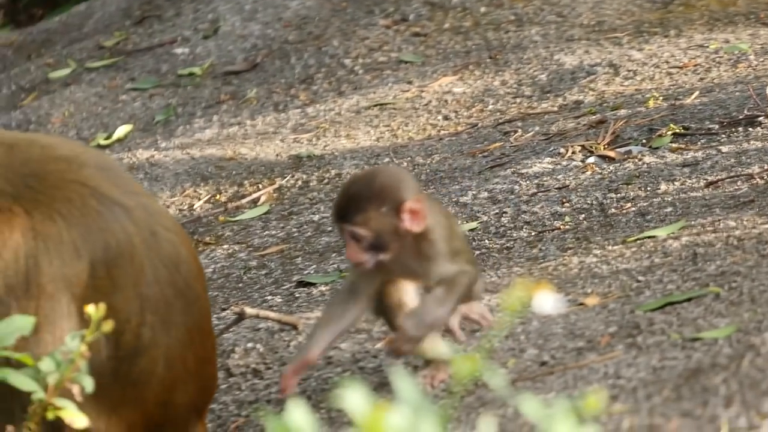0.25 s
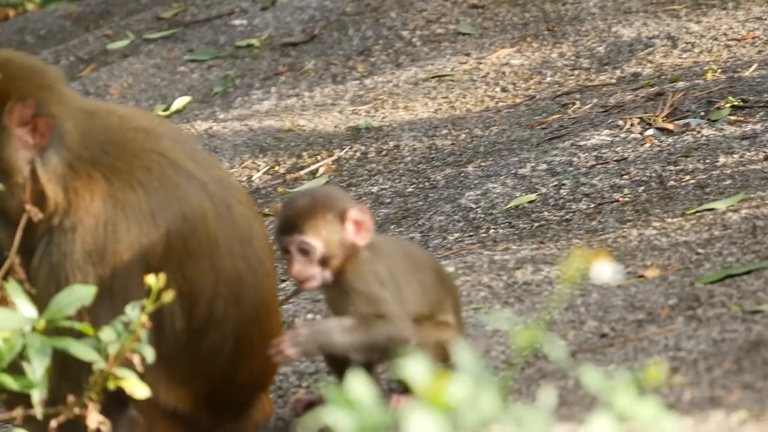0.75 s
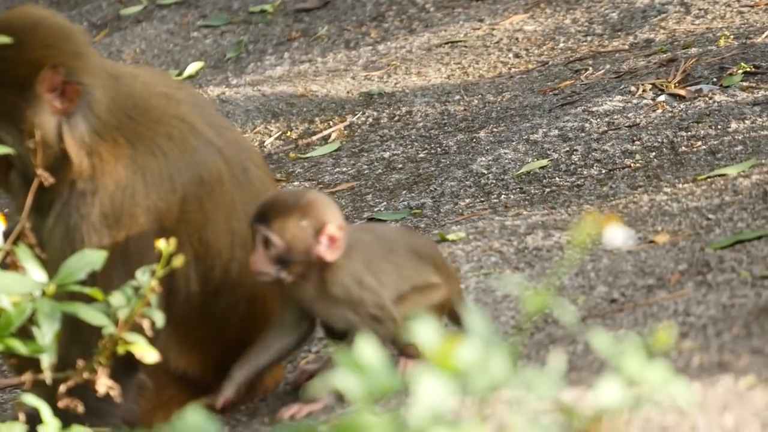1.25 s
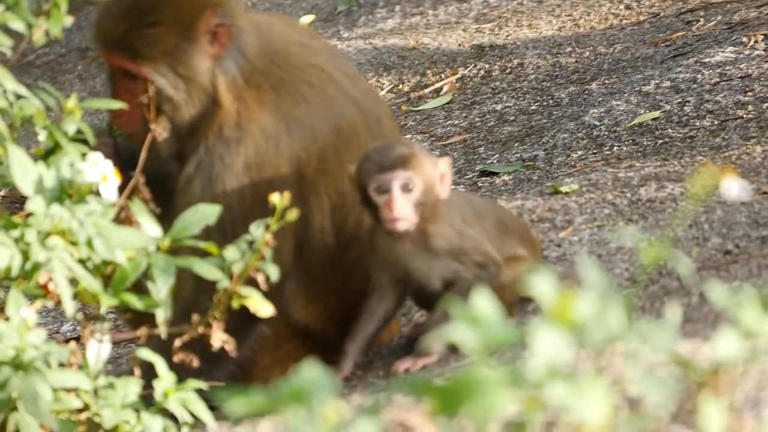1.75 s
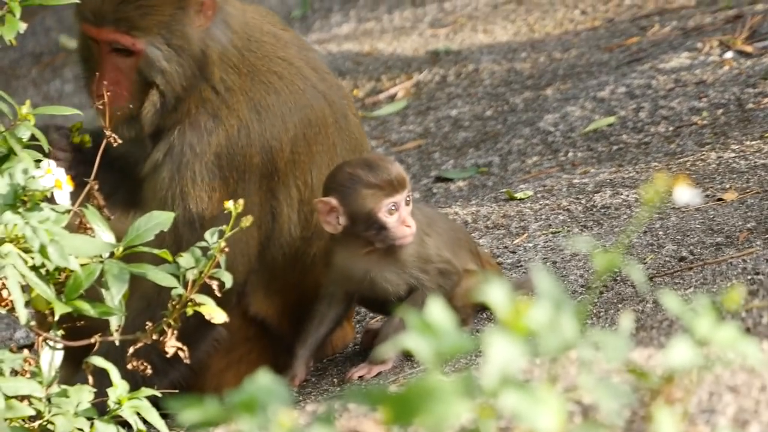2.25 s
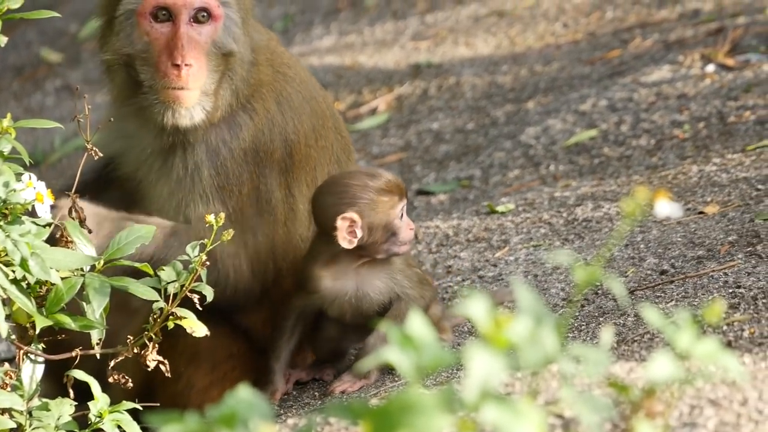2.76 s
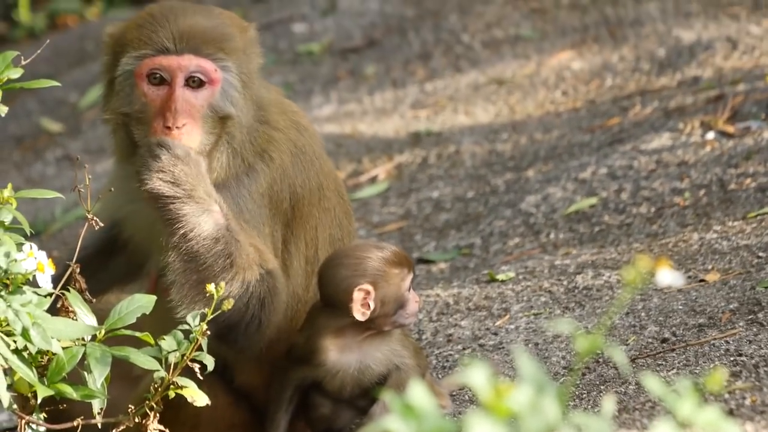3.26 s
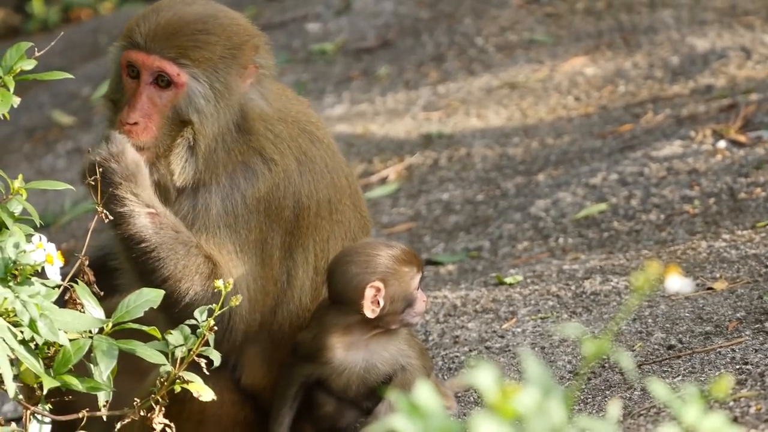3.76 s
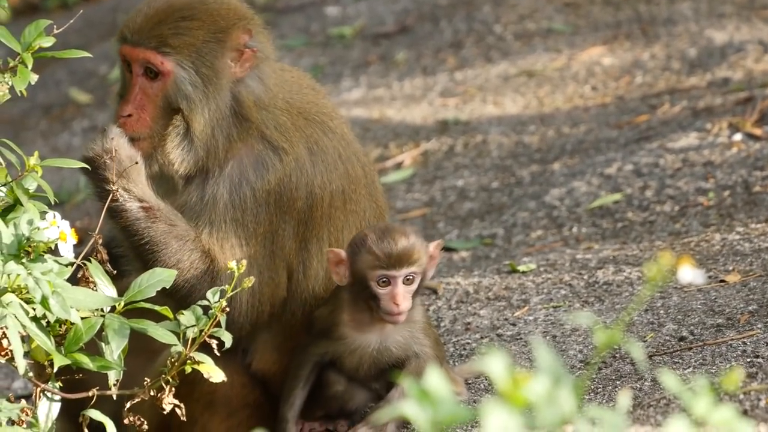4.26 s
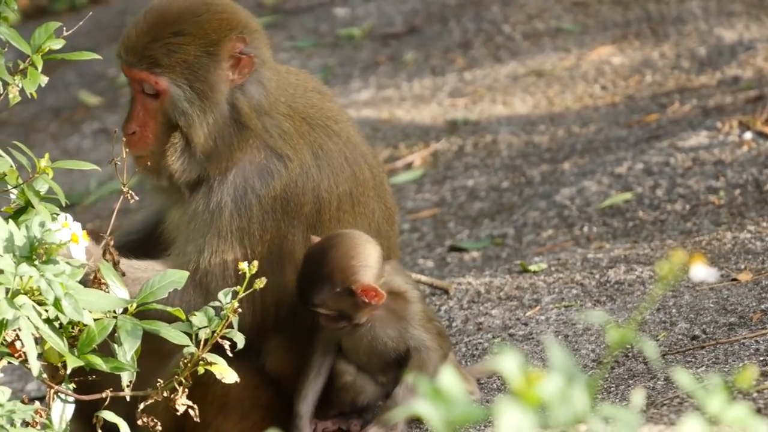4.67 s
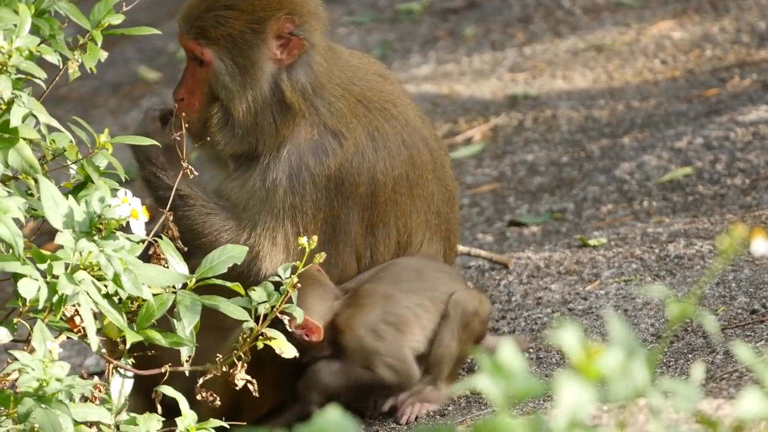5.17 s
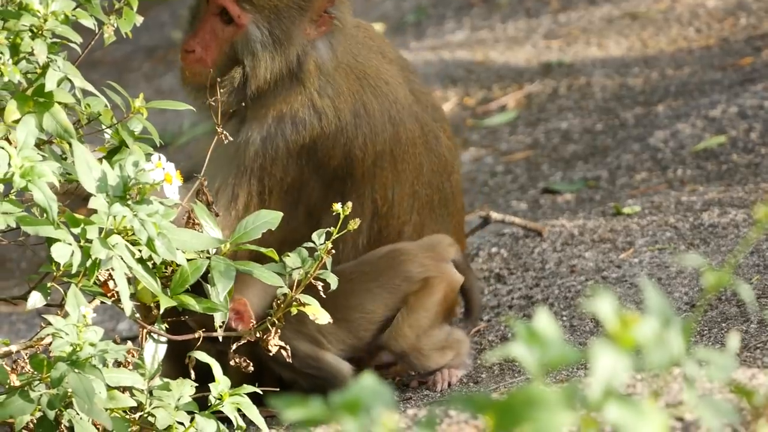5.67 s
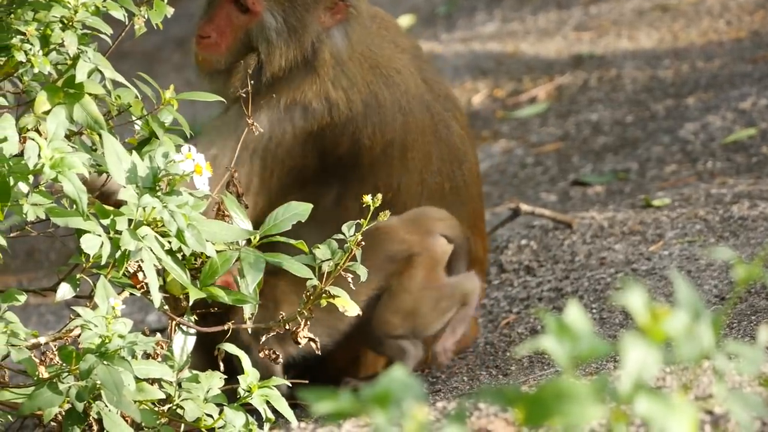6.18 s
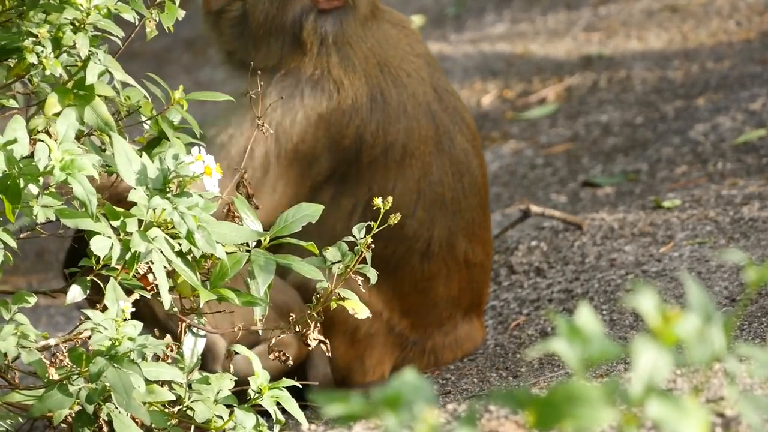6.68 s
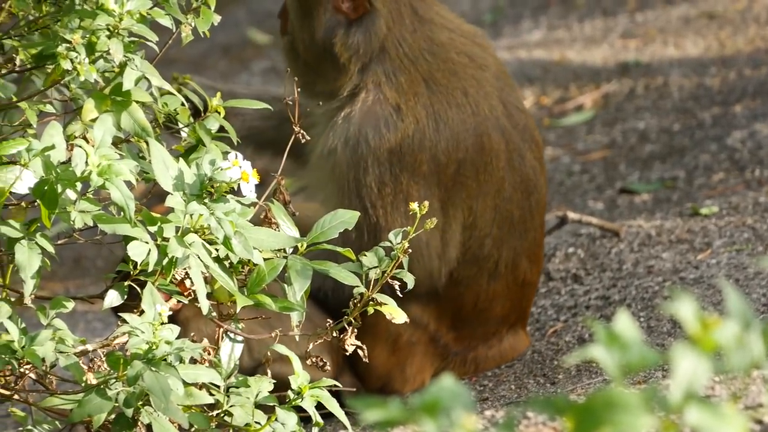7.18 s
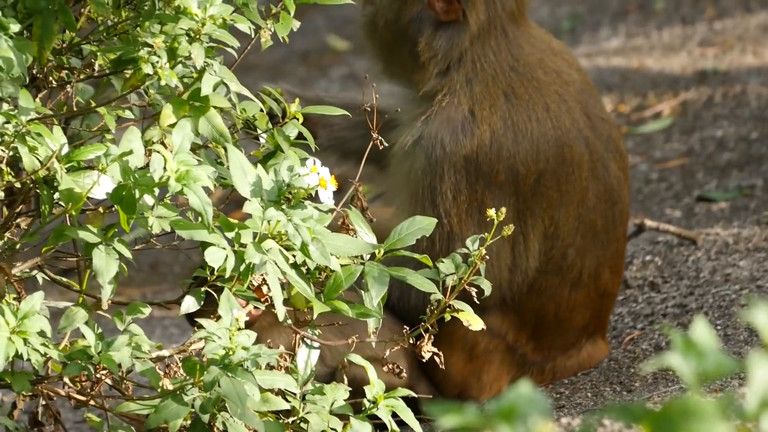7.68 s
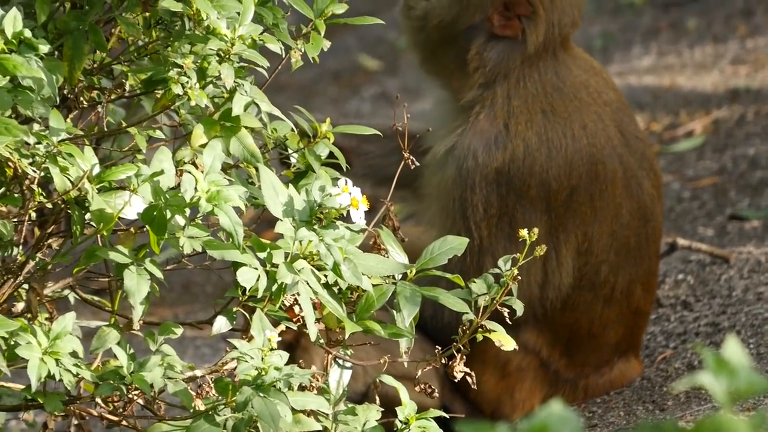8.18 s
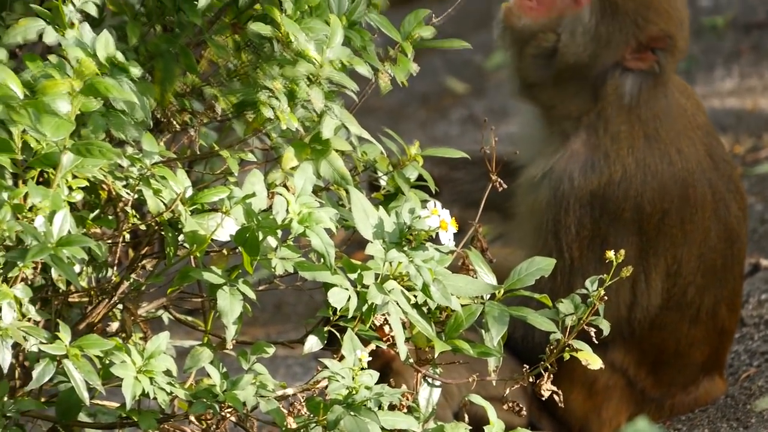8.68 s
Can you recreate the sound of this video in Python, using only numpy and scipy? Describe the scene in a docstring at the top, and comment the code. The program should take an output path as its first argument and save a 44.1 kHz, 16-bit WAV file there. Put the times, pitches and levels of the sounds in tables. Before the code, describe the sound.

Harsh, high squeals and short yelps from an infant macaque echo off a rock slope, with wind buffets thudding softly at the microphone.

```python
"""Shrill, rasping squeals of a baby macaque on a rock slope; an adult gives a few hoarse huffs.
The squeals are tones that turbulent vocal folds split into sidebands; the huffs are noise through resonances.
Rock and trees return the calls as reflections and a diffuse tail. Filtered noise makes hissing leaves,
far traffic and low buffets; damped swings make soft knocks at the two microphone ports."""
import sys
import numpy as np
from scipy import signal
from scipy.fft import rfft, irfft
from scipy.io import wavfile

SR = 44100
rng = np.random.default_rng(int(sys.argv[2]) if len(sys.argv) > 2 else 0)


def dump(signal):
    """Clip the signal to [-1, 1] and save it as 16-bit WAV at the path in sys.argv[1]."""
    limited = np.clip(np.atleast_2d(signal).T, -1, 1)
    pcm = np.round(limited * 32767).astype(np.int16)
    wavfile.write(sys.argv[1], SR, pcm)


N = 393813
TIME = np.arange(N) / SR
HZ = np.fft.rfftfreq(N, 1 / SR)


def gain_of(db):
    """Decibels are logarithmic: 20 dB is a factor of ten in amplitude."""
    return 10 ** (np.asarray(db) / 20)


def evened(x):
    """Normalisation: scales the root mean square to 1."""
    return x / np.sqrt(np.mean(abs(x) ** 2) + 1e-20)


def read(points, hz):
    """Interpolation of a (Hz, value) table along log frequency, the scale of pitch."""
    f, value = np.transpose(points)
    return np.interp(np.log(hz + 1), np.log(f + 1), value)


def curve(rows, axis=1):
    """Linear interpolation of one column of a table over the whole scene."""
    rows = np.asarray(rows)
    return np.interp(TIME, rows[:, 0], rows[:, axis])


def add(mix, s, sound):
    """Superposition: mixes a sound in at time s."""
    part = mix[..., max(round(s * SR), 0):][..., :sound.shape[-1]]
    part += sound[..., :part.shape[-1]]


def colour(x, points):
    """Linear filtering: multiplies the spectrum by a (Hz, dB) table."""
    size = x.shape[-1]
    hz = np.fft.rfftfreq(size, 1 / SR)
    return irfft(rfft(x) * gain_of(read(points, hz)), size)


def wander(size, width_hz, centre_hz=0):
    """Narrow-band noise: random motion of rms 1 whose rates lie in a bell around centre_hz."""
    hz = np.fft.rfftfreq(size, 1 / SR)
    bell = np.exp(-.5 * ((hz - centre_hz) / width_hz) ** 2)
    return evened(irfft(rfft(rng.standard_normal(size)) * bell, size))


def noise_pair(points, likeness):
    """Partial coherence: coloured noise in two channels with the given correlation."""
    a, b = rng.standard_normal((2, N))
    same = np.clip(likeness, -1, 1)
    pair = np.array([a, same * a + np.sqrt(1 - same ** 2) * b])
    return evened(colour(pair, points))


def placed(x, left_db):
    """Level-difference panning: a positive left_db tips a sound to the left."""
    return x * gain_of([[left_db / 2], [-left_db / 2]])


def hollow(hz, centre_hz, width_hz, depth_db):
    """Antiresonance: the gain of a bell-shaped dip in a spectrum."""
    return gain_of(-depth_db * np.exp(-.5 * ((hz - centre_hz) / width_hz) ** 2))


def traffic(whine_hz=468):
    """Low-pass noise of a far road, with a faint whine made by random frequency modulation."""
    # Spectrum of the roar. Each row: frequency in Hz, relative level in dB.
    roar_colour = [(20, -30.5), (35, -18.5), (100, 6), (300, -0.5), (480, 1), (650, -7), (900, -13.5),
                   (1400, -23.5), (2500, -28), (5000, -45)]
    # Each row: time in seconds, roar level in dB, whine level against the roar in dB.
    road = [(0, -48.5, -32), (1.5, -52.5, -44), (2.3, -48, 0.5), (3.2, -46, -14), (4.8, -46.5, -14),
            (5.12, -41, 1), (5.35, -41.5, -12), (6.3, -41.5, -11), (7, -41, -2), (7.8, -47, -11.5),
            (8.93, -48, -15.5)]
    whine = np.sin(2 * np.pi * np.cumsum(whine_hz + 11 * wander(N, 25)) / SR)
    whine = whine * gain_of(2.5 * wander(N, 4))
    roar = noise_pair(roar_colour, 0.61)
    return placed(roar + gain_of(curve(road, axis=2)) * whine, 1.2) * gain_of(curve(road))


def foliage(snap_s=0.0014):
    """Many small contacts sum to broadband noise as leaves stir; dry snaps are brief decaying bursts."""
    # Spectrum of the leaves. Each row: frequency in Hz, relative level in dB.
    leaf_colour = [(300, -6), (1000, 2.5), (2500, 3.5), (4500, 4.5), (7000, 3.5), (10000, 2), (12000, -8),
                   (15000, -28.5)]
    # Breeze in the leaves. Each row: time in seconds, relative level in dB.
    breeze = [(0, -67), (.7, -57.5), (2.1, -55), (2.6, -60), (3.6, -63.5), (4.25, -68.5), (4.7, -66.5),
              (4.9, -60.5), (5.95, -63), (6.5, -59.5), (7.1, -66.5), (8, -70), (8.4, -70), (8.93, -52)]
    # Brief rustles. Each row: centre in seconds, relative level in dB.
    rustles, rustle_s = [(6.78, -66.5), (7.38, -66)], 0.066
    # Dry twigs and leaves snapping. Each row: start in seconds, level before the decay in dB.
    snaps = [(6.716, -51), (7.375, -38.5), (7.399, -38), (7.8, -46.5), (8.595, -43)]
    stir = gain_of(curve(breeze))
    stir = stir + sum(gain_of(db) * np.exp(-((TIME - s) / rustle_s) ** 2) for s, db in rustles)
    out = noise_pair(leaf_colour, 0.67) * stir * gain_of(4.0 + 0.45 * wander(N, 50))
    t = np.arange(SR // 40) / SR
    for s, level_db in snaps:
        noise = rng.standard_normal((2, len(t)))
        crack = evened(colour(noise, [(1000, -10), (4500, -6), (9000, -5), (15000, -25)]))
        add(out, s, gain_of(level_db) * crack * np.exp(-t / snap_s))
    return out


def flurries(rise_s=0.03, fall_s=0.1, calm_db=-45.5):
    """Powers of independent flurries add: each rises, holds and dies back to the calm."""
    # Flurries of buffeting. Each row: start in seconds, length in seconds, relative level in dB.
    flurry_rows = [(0.1, 1.306, -35), (1.77, 0.076, -28), (1.95, 0.81, -38), (2.8, 0.15, -30.5),
                   (3.0, 0.52, -38.5), (3.8, 0.85, -31), (4.75, 1, -39.5), (5.47, 0.45, -35.5),
                   (6.1, 1.26, -43), (8.46, 0.02, -35)]
    power = gain_of(calm_db) ** 2
    for start, length, level_db in flurry_rows:
        rise = np.clip((TIME - start) / rise_s, 0, 1)
        fall = np.exp(-np.maximum(TIME - start - length, 0) / fall_s)
        power = power + (gain_of(level_db) * rise * fall) ** 2
    return np.sqrt(power)


def patter(strength, count=200, per_s=14, over_db=9.5, spread_db=7, centre_hz=210):
    """A random point process: small knocks that follow the flurries in level (time, dB, Hz)."""
    chance = rng.random((count, 3))
    times = np.cumsum(.5 + chance[:, 0]) / per_s
    flurry_db = 20 * np.log10(np.interp(times, TIME, strength))
    peak_db = flurry_db + over_db + spread_db * (2 * chance[:, 1] - 1)
    pitch_hz = centre_hz * 2 ** ((chance[:, 2] - .5) / 2)
    return [row for row in zip(times, peak_db, pitch_hz) if row[0] < TIME[-1]]


def knocks(rows, rise_cycles=0.076, fall_cycles=0.74):
    """Heavily damped oscillation dies within a cycle or two; harder knocks start more sharply."""
    out, t = np.zeros(N), np.arange(-SR // 100, SR // 25) / SR
    for (s, peak_db, hz), turn in zip(rows, rng.random(size=256)):
        cycles, rise = hz * t, rise_cycles / gain_of(peak_db + 17.5)
        # a smooth peak between an exponential rise and an exponential fall
        shape = np.exp(-np.logaddexp(-cycles / rise, cycles / fall_cycles))
        swing = np.cos(2 * np.pi * (cycles + turn))
        add(out, s + t[0] - .001, gain_of(peak_db + 4.5) * shape * swing)
    return colour(out, [(20, -40.5), (50, -19), (100, -3.0), (160, -0.5), (550, 0.5),
                        (900, -9), (1600, -26.5), (4000, -53)])


def buffeting(lumpy_db=3.0, rumble_db=2.0):
    """Interchannel phase and level: low rumble and knocks lead at the right, mostly louder at the left."""
    # Spectrum of the rumble. Each row: frequency in Hz, relative level in dB.
    rumble_colour = [(20, -53), (40, -50), (60, -13), (85, -2.5), (130, 1), (200, -3.5), (300, -11.5),
                     (450, -24), (800, -33.5), (2000, -63)]
    # The loudest low knocks. Each row: time in seconds, relative peak level in dB, pitch in Hz.
    loud_knocks = [(0.246, -15, 190), (0.272, -16, 266), (0.514, -15.5, 207), (0.533, -17, 210),
                   (0.606, -10.5, 245), (1.368, -19.5, 197), (1.831, -16.5, 177), (1.853, -18.5, 190),
                   (1.963, -14, 260), (2.283, -19, 161), (2.59, -20.5, 237), (2.759, -16, 224),
                   (2.835, -15.5, 275), (2.864, -16, 161), (3.327, -13.5, 255), (3.812, -13.5, 190),
                   (3.83, -17.5, 264), (4.088, -17.5, 204), (4.225, -12, 204), (4.396, -9.5, 288),
                   (4.451, -11.5, 272), (4.506, -18, 215), (4.598, -14.5, 248), (4.649, -11.5, 283),
                   (5.161, -18, 148), (5.208, -17.5, 232), (5.754, -15, 205), (8.506, -17.5, 223)]
    strength = flurries()
    lumpy = noise_pair(rumble_colour, 0.91) * gain_of(lumpy_db * wander(N, 36))
    rumble = evened(lumpy) * strength * gain_of(rumble_db)
    left_db = read([(100, -0.5), (170, 0.5), (260, 4.0), (450, 11.5), (900, -1.5)], HZ)
    lag = read([(70, .1), (200, 0.58), (500, 2.34)], HZ)  # radians by which the left trails
    left = gain_of(left_db / 2) * np.exp(-.5j * lag)
    right = gain_of(-left_db / 2) * np.exp(.5j * lag)
    return irfft(rfft(rumble + knocks(loud_knocks + patter(strength))) * np.array([left, right]), N)


def slope(x, near_db=-8, near_s=0.029, far_db=-14):
    """Reverberation: quick reflections off the rock, partly alike at both ports, then a tail from the trees."""
    # Decay of the tail. Each row: frequency in Hz, reverberation time (60 dB) in seconds.
    tail_decay = [(500, 0.71), (1500, 0.59), (2500, 0.87), (4000, 0.88), (8000, 0.88), (14000, 0.13)]
    t = np.arange(SR) / SR
    taps = rng.choice([-1., 1.], (2, SR)) * (rng.random((2, SR)) < 2500 / SR)  # sparse echoes
    near = (taps + taps[::-1] / np.pi) * np.exp(-t / near_s) * (t > .001)
    hz, frame_s, z = signal.stft(taps * np.minimum(t / 0.045, 1), SR, nperseg=256)
    decay = gain_of(-60 * frame_s / read(tail_decay, hz)[:, None])
    far = signal.istft(z * decay, SR, nperseg=256)[1][:, :SR]
    echo = sum(gain_of(db) * part / np.linalg.norm(part, axis=1, keepdims=True)
               for db, part in ((near_db, near), (far_db, far)))
    return signal.fftconvolve(x[None], echo, axes=1)[:, :N]


def adult(fall_s=0.019, rattle_db=-3.0, chest_hz=660, chest_width_hz=280):
    """Source and filter: puffs of turbulent air rattle through the resonances of a larger throat."""
    # Hoarse huffs. Each row: start in seconds, level in dB, rise in seconds, hold in seconds,
    # factor on the throat's resonances, treble tilt in dB an octave, chest resonance in dB.
    huffs = [(0.936, -39, 0.027, 0.033, 0.77, -6.5, -6.5), (2.649, -32.5, 0.013, 0.04, 0.89, 3, 6.5),
             (5.764, -39.5, 0.0028, 0.025, 0.9, 0.5, 3.5), (5.815, -34.5, 0.0025, 0.014, 0.76, 2, 1),
             (8.404, -39, 0.0026, 0.01, 0.91, -6, -10), (8.449, -33, 0.018, 0.052, 0.9, -2, -10)]
    # Throat above the chest resonance. Each row: unscaled frequency in Hz, width in Hz, level in dB.
    throat_modes = [(1340, 92, 2.5), (1820, 390, -6), (3370, 200, -5), (4250, 570, -13), (6200, 3000, -25)]
    out, t = np.zeros(N), np.arange(SR // 4) / SR
    hz = np.fft.rfftfreq(len(t), 1 / SR)
    for s, level_db, rise, hold, scale, tilt_db, chest_db in huffs:
        modes = [(chest_hz, chest_width_hz, chest_db)]
        modes += [(f * scale, width, db) for f, width, db in throat_modes]
        throat = np.sqrt(sum(gain_of(db) ** 2 / (1 + ((hz - f) / width) ** 2) ** 2
                             for f, width, db in modes))
        tilt = gain_of(tilt_db * np.log2(hz / 1000 + 0.12))
        air = irfft(rfft(rng.standard_normal(len(t))) * throat * tilt, len(t))
        push = np.minimum(t / rise, 1) * np.exp(-np.maximum(t - rise - hold, 0) / fall_s)
        rattling = evened(air * gain_of(rattle_db * wander(len(t), 130)))
        add(out, s, gain_of(level_db) * push * rattling)
    return out


def strands(carrier, flutter, rough, weights):
    """Modulation sidebands round one harmonic, a flutter apart; each flares and drifts on its own."""
    size = len(carrier)
    return sum(weight * (1 + .9 * wander(size, 55))
               * np.cos(carrier + k * flutter + rough * wander(size, 50))
               for k, weight in weights)


def squeal(start, hz, call_db, sag_db, overtone_db, kind, flutter_hz=500, sideband_fall_db=-2.5,
           overtone_fall_db=-6.5, hollow_width_hz=560):
    """Nonlinear phonation: in a strained voice the folds flutter and the tone splits into rasping strands."""
    # Roughness (0-1) of each kind of voice at the start, middle and end of a call.
    roughness_of = {"harsh": (1, .6, .8), "clearing": (1, .2, .08), "breaking": (0, .3, .9),
                    "rasping": (.3, .5, .4), "clean": (.05, .08, .15)}
    # Colour of the overtones and rasp. Each row: frequency in Hz, relative level in dB.
    rasp_colour = [(1000, -6.5), (1600, -6), (2200, -5), (4000, 1.5), (4700, 5), (5400, 0), (7000, 1),
                   (8500, 0.5), (10000, 0.5), (12000, -15), (15000, -63)]
    # Mouth resonance on the broken voice, with little below it. Each row: frequency in Hz, level in dB.
    mouth_colour = [(800, -22.5), (1550, -26), (2050, 4.5), (2500, -3), (3300, 0.5), (3900, -3),
                    (4600, -10.5), (6500, -19)]
    # Gain as the pitch passes the resonance of the mouth. Each row: pitch in Hz, gain in dB.
    swell_by_pitch = [(1100, 1), (1600, -5), (2000, -3), (2500, 4.5), (3000, -4.5), (3400, 4.5), (3800, -9),
                      (4700, 0)]
    # Chaotic folds fill the whole mouth resonance. Each row: frequency in Hz, relative level in dB.
    screech_colour, screech_db = [(1000, -32.5), (1700, -32), (2150, -5), (2500, -0.5), (3100, 0),
                                  (3700, -2.5), (4500, -9.5), (6000, -43.5)], -0.5
    # Hollow that varies with mouth shape. Each row: time in seconds, depth in dB, centre in Hz.
    mouth_hollow = [(1.0, 6, 4400), (3.199, 0, 4520), (4.5, 12, 4620), (6.2, 7, 3670), (8.7, 37, 4940)]
    attack_share, release_s = 0.34, 0.016  # a slow swell over a share of the call, a quick stop
    shake_db, shake_share, shake_per_s = 1.5, .02, 35  # at full roughness, in level and in pitch

    size = len(hz)
    t, u = np.arange(size) / SR, np.linspace(0, 1, size)
    opening = np.sin(np.pi / 2 * np.minimum(u / attack_share, 1))
    effort = gain_of(call_db - sag_db * u) * opening * np.minimum(t[::-1] / release_s, 1)
    rough = np.minimum(np.interp(u, [0, .5, 1], roughness_of[kind]), 1)
    effort = effort * gain_of(shake_db * rough * wander(size, shake_per_s))

    jitter = (.003 + .035 * rough ** 2) * wander(size, 240)
    jitter = jitter + shake_share * rough * wander(size, shake_per_s)
    phase = 2 * np.pi * np.cumsum(hz * (1 + jitter)) / SR
    # a slower, unsteady vibration of the folds throws sidebands above the tone
    flutter = 2 * np.pi * np.cumsum(flutter_hz * (1 + .2 * wander(size, 45))) / SR
    sidebands = [(k, gain_of(sideband_fall_db * abs(k))) for k in (0.0, 1, 3.0, 7.5)]
    rasp = strands(phase, flutter, rough, sidebands)
    broken = .95 * rough ** 1.1  # share of the power
    clear = np.sqrt(2 * (1 - broken)) * np.cos(phase) * gain_of(2.0 * rough * wander(size, 200))
    tone = clear + np.sqrt(broken) * evened(colour(rasp, mouth_colour))

    # the overtones split far more readily than the fundamental
    spread = [(k, np.minimum(1.3 * rough, 1) ** abs(k)) for k in range(-2, 3)]
    overtones = sum(gain_of(overtone_fall_db * k) * strands(k * phase, flutter, rough, spread)
                    for k in range(2, 5))
    spread_size = np.sqrt(sum(weight ** 2 for k, weight in spread))
    overtones = evened(colour(overtones / spread_size, rasp_colour))
    hiss = evened(colour(rng.standard_normal(size) * (1 + 1.2 * np.cos(flutter)), rasp_colour))
    hiss_share = .06 + .2 * rough
    upper = np.sqrt(1 - hiss_share) * overtones + np.sqrt(hiss_share) * hiss

    chaos = colour(rng.standard_normal(size), screech_colour)
    screech = rough ** 2 * evened(chaos * gain_of(1 * wander(size, 150)))
    focus = np.sqrt(1 - .6 * rough ** 2)  # roughness takes strength from the tone
    # the thin rasp comes first; the body follows as the mouth opens and the pitch meets its resonance
    swell = gain_of(read(swell_by_pitch, hz))
    body = focus * swell * tone + gain_of(screech_db) * np.sqrt(swell) * screech
    voice = effort * (opening * body + gain_of(overtone_db) * upper)
    mouth_s, depths, centres = np.transpose(mouth_hollow)
    depth_db, centre_hz = np.interp(start, mouth_s, depths), np.interp(start, mouth_s, centres)
    dip = hollow(np.fft.rfftfreq(size, 1 / SR), centre_hz, hollow_width_hz, depth_db)
    return start, irfft(rfft(voice) * dip, size)


def baby(scoop_bend=2.1):
    """Pitch is logarithmic: scoops ease down and up again in octaves; glides slide at a steady rate."""
    # Squeals that dip and climb back. Each row: start in seconds, length in seconds, time to the dip
    # in seconds, first, lowest and last pitch in Hz, relative level in dB, sag over the call in dB,
    # overtones in dB, kind of voice.
    scoops = [(0.234, 0.17, 0.073, 3950, 2578, 3710, -20.5, 14, -6.5, "harsh"),
              (0.829, 0.16, 0.07, 3650, 2475, 3530, -18.5, 14.5, -10, "harsh"),
              (0.983, 0.075, 0.04, 3400, 2825, 2940, -18, 1, -14, "harsh"),
              (1.035, 0.12, 0.076, 2806, 2490, 3700, -28.5, 3.5, -9.5, "clearing"),
              (1.19, 0.094, 0.082, 3700, 1892, 1920, -22.5, 5, -12, "clearing"),
              (2.181, 0.12, 0.061, 3300, 2296, 3150, -24.5, 11, -5.5, "harsh"),
              (2.274, 0.14, 0.05, 3100, 2780, 3430, -29, 3, -8, "harsh"),
              (2.914, 0.21, 0.1, 3700, 2300, 3394, -20.5, 13.5, -11, "harsh"),
              (3.084, 0.26, 0.13, 3450, 1991, 2685, -19, 16, -10.5, "harsh"),
              (3.344, 0.17, 0.082, 3200, 2450, 3160, -27, 14, -10.5, "harsh"),
              (4.423, 0.095, 0.043, 3500, 2690, 3130, -28.5, 12.5, -8.5, "clearing"),
              (6.188, 0.07, 0.034, 2690, 2386, 2465, -33, 3.5, -8.5, "clean"),
              (8.632, 0.086, 0.024, 3200, 2640, 3380, -34.5, 4, -12, "breaking"),
              (8.707, 0.18, 0.085, 3300, 2720, 3214, -25.5, 5.5, -11, "harsh"),
              (8.865, 0.11, 0.074, 3250, 2735, 3100, -25.5, 2, -9, "harsh")]
    # Yelps, whimpers and thin whistles that slide one way. Each row: start in seconds, length in
    # seconds, first and last pitch in Hz, relative level in dB, sag over the call in dB,
    # overtones in dB, kind of voice.
    glides = [(0.2, 0.026, 4660, 4900, -31, 4, -14, "clean"),
              (0.391, 0.071, 4110, 2020, -26.5, 4, -3.5, "harsh"),
              (1.634, 0.078, 2536, 1947, -32.5, 1.5, -16, "clean"),
              (1.678, 0.066, 2150, 1200, -33.5, 11, -11, "harsh"),
              (2.398, 0.13, 3950, 1283, -17.5, 20.5, -9.5, "harsh"),
              (3.512, 0.089, 3556, 1633, -23.5, 17, -9, "harsh"),
              (3.905, 0.094, 1890, 1185, -37.5, 17.5, -5, "rasping"),
              (4.51, 0.041, 2990, 1725, -42, -6.5, -8.5, "rasping"),
              (5.149, 0.12, 1660, 2170, -51, 3, -6, "clean"),
              (5.243, 0.06, 2780, 1700, -39.5, -1, -6, "harsh"),
              (6.043, 0.063, 1042, 3810, -40.5, 19, 4, "rasping"),
              (6.068, 0.06, 3270, 4750, -35.5, 5, -9, "rasping"),
              (6.172, 0.043, 2900, 2295, -30.5, 0.5, -10, "harsh"),
              (6.236, 0.045, 2380, 1930, -37, 5, -7, "rasping")]
    out = np.zeros(N)
    for start, length, dip_s, first_hz, low_hz, last_hz, *manner in scoops:
        t = np.arange(0, length, 1 / SR)
        away = np.interp(t, [0, dip_s, max(length, dip_s)], [1, 0, 1])  # distance from the dip
        height = np.sin(np.pi / 2 * away) ** scoop_bend
        end_hz = np.where(t < dip_s, first_hz, last_hz)
        add(out, *squeal(start, low_hz * (end_hz / low_hz) ** height, *manner))
    for start, length, first_hz, last_hz, *manner in glides:
        add(out, *squeal(start, np.geomspace(first_hz, last_hz, round(length * SR)), *manner))
    return out


def scene():
    """Localisation by level and phase: the baby leans right in its main band, the adult is near the middle."""
    # Level at the baby's place. Each row: frequency in Hz, left minus right in dB.
    baby_side = [(60, -7), (180, 2), (540, 4.5), (1620, -6), (4870, -2.5), (14600, -1.0)]
    # Phase at the baby's place. Each row: frequency in Hz, lead of the left in radians.
    baby_lead = [(0, 0), (1210, -0.5), (1640, -0.3), (2500, -0.2), (8610, 0.3), (14700, 0.1)]
    background = buffeting() + traffic() + foliage()
    huffs, squeals = adult(), baby()
    port = gain_of(read(baby_side, HZ) / 2) * np.exp(.5j * read(baby_lead, HZ))
    aside = irfft(rfft(squeals) * np.array([port, 1 / port]), N)
    return aside + placed(huffs, 1.0) + placed(slope(squeals + huffs), -2.0) + background


def record(dry, edge_hz=15150, notch_hz=7910, notch_width_hz=50, notch_db=17):
    """Linear filtering: a narrow notch in the treble, then a low-pass band limit."""
    notched = irfft(rfft(dry) * hollow(HZ, notch_hz, notch_width_hz, notch_db), N)
    low_pass = signal.firwin(511, edge_hz, window=("kaiser", 9), fs=SR)
    return signal.oaconvolve(notched, low_pass[None], "same")


dry = scene()
out = record(dry)
dump(out)
```